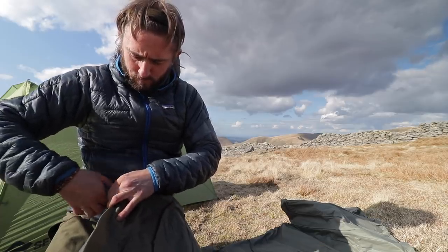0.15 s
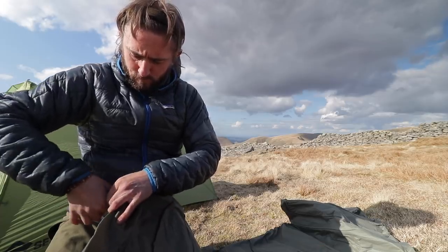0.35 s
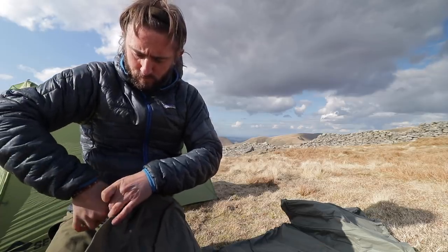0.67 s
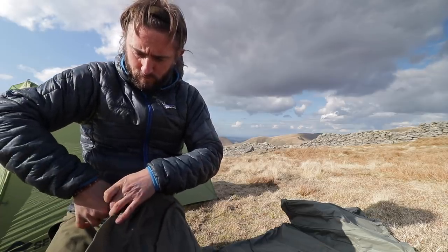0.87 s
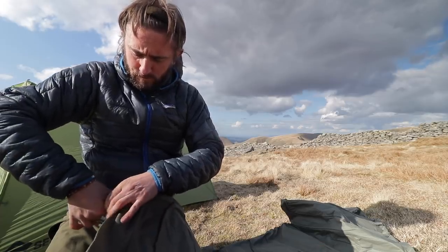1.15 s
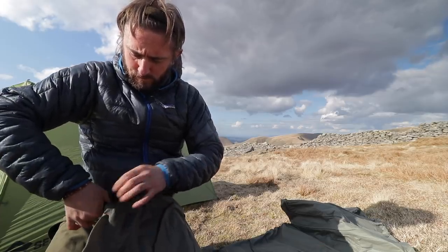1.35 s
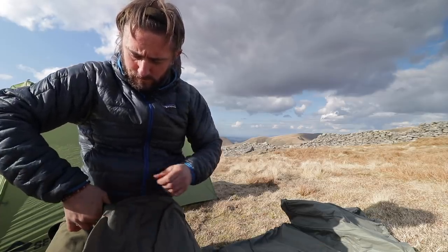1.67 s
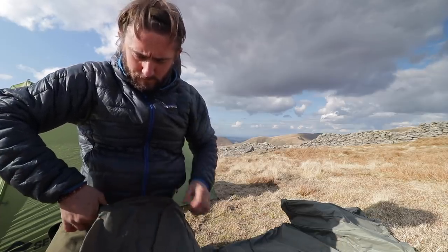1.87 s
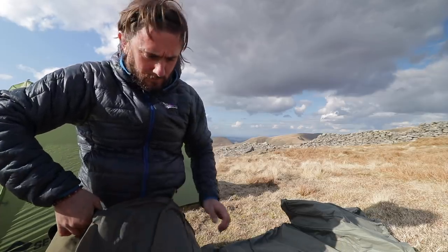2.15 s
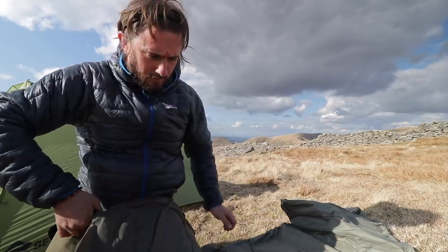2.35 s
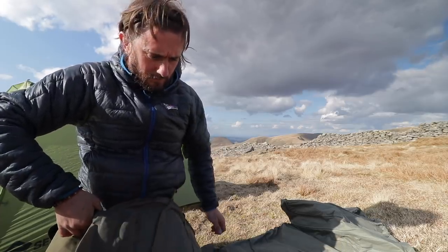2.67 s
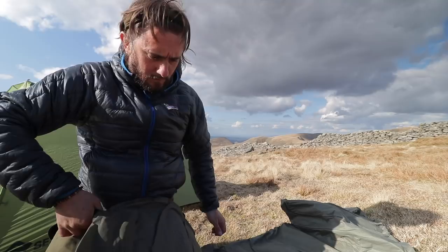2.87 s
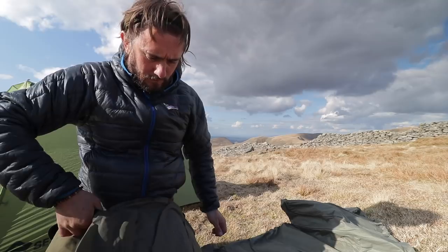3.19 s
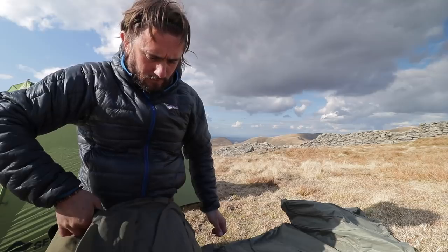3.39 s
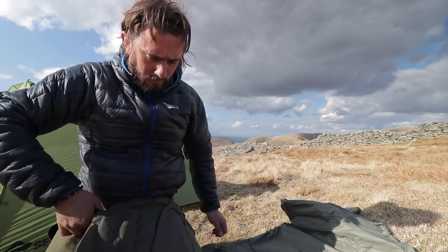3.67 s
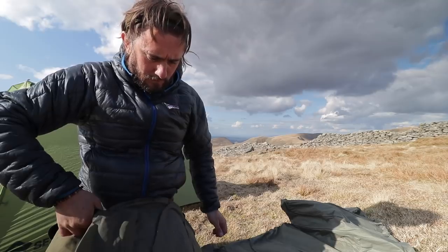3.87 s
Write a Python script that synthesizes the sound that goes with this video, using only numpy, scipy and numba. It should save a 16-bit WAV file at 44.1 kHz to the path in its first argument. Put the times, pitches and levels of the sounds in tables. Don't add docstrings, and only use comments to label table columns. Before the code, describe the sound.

Close, continuous rushing air and a fine electric whine from a palm-sized blower, lightly shaded by fingers, over very faint open-air wind.

```python
import sys
import numpy as np
from scipy import signal
from scipy.fft import rfft, irfft
from scipy.io import wavfile
from scipy.ndimage import uniform_filter1d
from numba import njit

SR = 44100
rng = np.random.default_rng(int(sys.argv[2]) if len(sys.argv) > 2 else 0)


def pcm_store(signal):
    levels = np.round(np.clip(np.atleast_2d(signal), -1, 1) * 32767)
    wavfile.write(sys.argv[1], SR, levels.astype(np.int16).T)


def volts_from_decibels(level):
    exponent = np.asarray(level, float) / 20
    return 10 ** exponent


N = 177365
TIME = np.arange(N) / SR
BINS_HZ = np.arange(N // 2 + 1) * SR / N
HAND_LIFTS_S = 1.34


def level(x, db):
    return x * volts_from_decibels(db) / np.sqrt(np.mean(x ** 2))


def columns(table):
    s, *rest = np.transpose(table)
    return [np.interp(TIME, s, column) for column in rest]


def gesture(s, half):
    return np.exp(-np.abs((TIME - s) / half) ** 3)


def gestures_db(table):
    return sum(db * gesture(s, half) for s, half, db in table)


def lifted(s):
    return (1 + np.tanh((TIME - s) / 0.028)) / 2


def walk(rate):
    hold = int(SR / rate)
    steps = np.repeat(rng.standard_normal(N // hold + 1), hold)
    return 2.16 * uniform_filter1d(uniform_filter1d(steps, hold), hold)[:N]


@njit
def svf(x, hz, width):
    y, band, low = np.empty(len(x)), 0., 0.
    for i in range(len(x)):
        g, k = np.tan(np.pi * hz[i] / SR), width / hz[i]
        v = (band + g * (x[i] - low)) / (1 + g * (g + k))
        band, low, y[i] = 2 * v - band, low + 2 * g * v, k * v
    return y


def rush(modes, centre_hz=0., flank_db=0., flicker_db=0.4):
    out, power = 0, 0
    for i, (hz, width, db) in enumerate(modes):
        track = hz + centre_hz + np.zeros(N)
        band = svf(rng.standard_normal(N), track, 1.63 * width)
        band = svf(band, track, 1.63 * width)
        gain = volts_from_decibels(db + flank_db * (i > 0))
        out = out + gain * volts_from_decibels(flicker_db * walk(6.2)) * band
        power = power + gain ** 2 * np.mean(band ** 2)
    return out / np.sqrt(power)


# (time [s], shaft rate [Hz])
SHAFT_SPEED = [(0, 621.5), (.1, 619.6), (.62, 616.7), (.8, 619.2), (.95, 617.8), (1, 615.8), (1.25, 619.2),
               (1.46, 619.8), (1.54, 618), (1.7, 623.5), (1.85, 625.4), (2, 623.5), (2.1, 625),
               (2.85, 627.5), (3.05, 626), (3.38, 628.5), (3.8, 623), (4.02, 623.7)]
# (time [s], level [dB])
BLADE_TONE = [(0, -39), (.07, -36.5), (.17, -48), (.33, -51), (.4, -61), (.49, -49.5), (.64, -49.5),
              (.68, -48), (.85, -42.5), (1.02, -51), (1.17, -45), (1.6, -44.5), (1.9, -42.5), (2.13, -44),
              (2.29, -50), (3.6, -49.5), (3.8, -55), (4.02, -53.5)]
# (multiple of shaft rate, level under the hand [dB], level once it has lifted [dB])
STRONG_TONES = [(3, -56.5, -48.5), (5, -54.5, -54.5), (16, -62.5, -58.5), (17, -55, -61.5),
                (18, -49.5, -52.5), (19, -63, -57.5), (21, -65, -65), (22, -69, -69), (23, -59, -70),
                (24, -62, -60.5), (25, -75, -77)]
# (multiple of shaft rate, steady level [dB], level against tone 17, whose path they share [dB])
WEAK_TONES = [(1, -73, -53), (2, -62, -51), (4, -55.5, -40), (6, -60, -54), (8, -58.5, -47), (10, -70, -22),
              (12, -72, -13), (15, -69, -18), (20, -90, -15)]
# (time [s], multiple of shaft rate, half length [s], level [dB])
GLINTS = [(.07, 21, .07, 10), (.07, 24, .07, 8), (0.087, 18, 0.066, 4.5), (0.266, 5, 0.25, 5),
          (.25, 19, .06, 4), (0.303, 18, .05, 8.5), (.3, 5, 0.053, 3), (.33, 21, .05, 5.5),
          (.37, 16, .05, 12), (.52, 17, .12, 4.5), (.64, 16, .1, 13), (.7, 19, 0.069, 7), (.7, 25, .08, 17),
          (.72, 23, .13, 7), (.75, 22, .08, 9), (1.05, 16, .1, 8), (1.05, 22, .06, 10), (1.08, 25, .1, 15),
          (1.1, 23, .12, 3), (1.2, 21, .1, 6), (1.37, 24, .09, 8), (1.48, 25, .03, 11), (1.52, 22, .1, 3),
          (1.55, 19, .13, 5), (1.84, 18, 0.27, 7), (1.9, 24, .25, 3), (2.13, 16, .12, 4),
          (3.152, 5, 0.32, 3), (3.9, 19, .2, 3.5), (3.9, 24, 0.22, 4)]
# (time [s], multiple of shaft rate, half length [s], level [dB])
NULLS = [(.02, 17, .06, -7), (.1, 3, .04, -10), (.2, 18, .03, -4), (.3, 17, .04, -5), (.35, 19, .03, -9),
         (.35, 23, .13, -10), (.45, 3, .12, -10), (.47, 19, .04, -9), (.48, 24, .05, -7), (.7, 17, .04, -9),
         (.8, 18, .08, -5), (.84, 16, .06, -9), (.86, 19, .05, -9), (.92, 17, .03, -7), (.93, 23, .05, -9),
         (1.2, 24, .04, -6), (1.214, 18, 0.067, -12), (1.335, 18, .015, -13), (1.35, 5, .2, -12),
         (1.49, 18, .015, -12), (1.6, 18, 0.049, -11), (1.65, 16, .3, -7), (1.83, 17, .08, -7),
         (1.9, 5, 0.27, -5), (2, 19, .08, -14), (2.3, 18, 0.27, -12), (3.05, 24, .15, -6),
         (3.45, 17, .15, -7), (3.85, 18, .22, -12), (3.9, 5, 0.074, -11)]


def impeller():
    shaft_hz, = columns(SHAFT_SPEED)
    blade_db, = columns(BLADE_TONE)
    turn = 2 * np.pi * np.cumsum(shaft_hz + 0.18 * walk(40)) / SR
    free = lifted(HAND_LIFTS_S)
    tone_db = {k: held_db + (free_db - held_db) * free for k, held_db, free_db in STRONG_TONES}
    for s, k, half, db in GLINTS + NULLS:
        tone_db[k] = tone_db[k] + db * gesture(s, half)
    gains = {k: volts_from_decibels(db) for k, db in tone_db.items()}
    gains[9] = volts_from_decibels(blade_db)
    for k, steady_db, shared_db in WEAK_TONES:
        gains[k] = volts_from_decibels(steady_db) + volts_from_decibels(shared_db) * gains[17]
    out = np.zeros(N)
    for k, gain in gains.items():
        waver = volts_from_decibels(0.6 * walk(30))
        out += np.sqrt(2) * gain * waver * np.sin(k * turn + 2 * np.pi * rng.random())
    return out


# (time [s], nearness of the pump [dB], opening past the fingers [dB],
# inlet pitch [Hz], grille pitch [Hz], spread of the jet [dB])
HAND = [(0, 3, -1, 4200, 7030, -23), (.17, 1.6, -2.5, 4500, 6990, -15), (.3, 0.5, -6.5, 4250, 7600, -1),
        (.46, -0.6, -5, 3933, 7450, -12), (.6, -0.7, -4, 4080, 7400, -17), (.68, -1.8, 1, 3970, 7340, -8),
        (.76, 0.2, -4.5, 3980, 7650, -9), (.83, 0.2, -4.5, 3970, 7000, -3), (.94, 0.6, -2.5, 3970, 7350, 0),
        (.98, -0.5, -1, 3960, 7260, -6), (1.04, -0.2, -3, 4140, 7200, -5),
        (1.29, 0.9, -3.5, 3990, 7270, -11), (1.33, -0.3, -0.5, 4070, 7160, 6),
        (1.53, .6, -1, 4110, 7150, -1), (1.58, 1, 2, 4120, 7120, -5), (1.93, 1.2, 1, 4170, 7200, -4),
        (2.07, 0.3, -1, 4288, 7150, 0.5), (4.02, .5, -0.1, 4320, 7224, -4)]


def hand():
    return columns(HAND)


# (pitch [Hz], width [Hz], level [dB])
HOUSING = [(2406, 503, 2), (430, 187, -20.5), (753, 284, -2), (1350, 318, 1), (1586, 325, -3),
           (1928, 176, 1), (2767, 180, 0), (3290, 510, -10)]


def housing(near_db, open_db, spread_db):
    gain = volts_from_decibels(-40.5 + 0.83 * near_db + 0.02 * open_db)
    return gain * rush(HOUSING, flank_db=1.5 + 0.28 * spread_db)


# (pitch [Hz], width [Hz], level [dB])
GAP = [(5300, 1270, 0), (5950, 460, 0)]


def gap(near_db, open_db):
    return volts_from_decibels(-51.5 + 2.7 * near_db + 0.05 * open_db) * rush(GAP)


# (offset from the centre [Hz], width [Hz], level [dB])
INLET = [(-20, 350, 4), (-380, 350, 3), (352, 305, 3.5), (800, 460, -12)]
# (time [s], half length [s], level [dB])
SLIDES = [
    (.3, .08, -0.5),
    (0.737, .05, -3.5),
    (0.943, 0.032, -2.5),
    (0.983, 0.01, 4),
    (1.2, 0.07, 2.5),
    (1.413, 0.13, -3),
    (1.68, .1, -1.5),
    (3.85, .2, -0.5),
]


def inlet(near_db, open_db, inlet_hz):
    cupped_db, pinched_db, free_db = 11, -7.5, -2
    flank_db = cupped_db + (pinched_db - cupped_db) * lifted(0.42) + (free_db - pinched_db) * lifted(1.5)
    gain = volts_from_decibels(-43 + 0.34 * near_db + 0.75 * open_db + gestures_db(SLIDES))
    return gain * rush(INLET, inlet_hz, flank_db)


# (offset from the centre [Hz], width [Hz], level [dB])
GRILLE = [(-18, 600, 1.4), (-650, 360, -2), (719, 390, 0)]


def grille(near_db, open_db, grille_hz, spread_db):
    flicker_db = 0.4 + 0.45 * gesture(1.4, 0.35)
    gain = volts_from_decibels(-42 + 0.02 * near_db + 1.39 * open_db)
    return gain * rush(GRILLE, grille_hz, spread_db, flicker_db)


# (pitch [Hz], width [Hz], level [dB])
TIP_LOW = [(8720, 1040, 5.5), (9790, 720, 10.5), (10650, 210, 0)]
# (pitch [Hz], width [Hz], level [dB])
TIP_HIGH = [(11030, 1200, 0), (12040, 800, -2.5), (12780, 500, 4.5), (13450, 650, 1), (13900, 420, -1),
            (14500, 600, 2), (14950, 500, -3), (15400, 400, -2)]


def blade_tips(near_db, open_db):
    sleeve_db = 2 * gesture(1.5, 0.39)
    low = volts_from_decibels(-52.5 + 1.2 * near_db + 0.73 * open_db + sleeve_db) * rush(TIP_LOW)
    high = volts_from_decibels(-52.5 + 0.3 * near_db + 0.05 * open_db) * rush(TIP_HIGH)
    return low + high


def air():
    near_db, open_db, inlet_hz, grille_hz, spread_db = hand()
    body = housing(near_db, open_db, spread_db) + gap(near_db, open_db)
    openings = inlet(near_db, open_db, inlet_hz) + grille(near_db, open_db, grille_hz, spread_db)
    return body + openings + blade_tips(near_db, open_db)


# (pitch [Hz], width [Hz], share removed [0-1])
ECHO_DIPS = [(1026, 148, 0.61), (2207, 94, 0.38), (3640, 170, 0.46)]
# (pitch [Hz], width [Hz], share removed [0-1], start [s], end [s])
HAND_DIPS = [
    (12700, 300, .65, -1, .97),
    (6200, 500, .4, .3, 0.56),
    (15750, 500, .6, .2, 1.57),
    (14450, 400, .35, .9, 2),
    (7140, 220, 0.55, 1.34, 2),
]


def echoed(x):
    for hz, width, share in ECHO_DIPS:
        x = x - share * svf(x, hz + np.zeros(N), width)
    for hz, width, share, start, end in HAND_DIPS:
        close = lifted(start) - lifted(end)
        x = x - share * close * svf(x, hz + np.zeros(N), width)
    return x


# (time [s], half length [s], level over the breeze [dB])
GUSTS = [(0, .05, 8), (.3, .13, 4), (.66, .04, 4), (.76, 0.055, 4), (.97, .05, 1), (1.15, .04, 7),
         (1.3, .1, 3), (1.86, .19, 11.5), (2.15, 0.11, 7), (2.366, 0.14, 15), (2.658, 0.11, 12),
         (2.93, 0.069, 12), (3.2, .2, 6), (3.5, .15, 4), (3.768, .05, 10), (4.02, .05, 3)]


def wind():
    low_band = signal.butter(2, [16, 55], "bandpass", fs=SR, output="sos")
    puff = signal.sosfilt(low_band, rng.standard_normal(N))
    breeze_db = -75
    return volts_from_decibels(breeze_db + gestures_db(GUSTS)) * level(puff * volts_from_decibels(1.1 * walk(14)), 0)


# (pitch [Hz], level per Hz [dB])
MOOR = [(41, -58), (70, -14.5), (140, -13), (323, -3.5), (381, -2.5), (438, 6), (500, -4.5), (650, -43),
        (1100, -120)]


def moor():
    hz, db = np.transpose(MOOR)
    colour_db = np.interp(np.log(np.maximum(BINS_HZ, 1)), np.log(hz), db, -80, -80)
    hush = irfft(rfft(rng.standard_normal(N)) * volts_from_decibels(colour_db), N)
    return level(hush, -67)


# (time [s], low edge [Hz], high edge [Hz], level [dB])
SPLITS = [
    (.05, 4230, 5300, -46),
    (.05, 6800, 8300, -49),
    (.748, 5630, 6900, -53),
    (1.746, 5670, 7600, -44),
    (2.093, 5650, 6940, -48),
    (2.14, 6700, 8800, -47),
    (3.046, 5670, 7750, -46),
    (3.742, 4170, 5300, -46),
    (3.742, 7600, 8900, -51),
    (3.766, 6300, 7700, -45),
]


def splits():
    out, hiss = np.zeros(N), rfft(rng.standard_normal(N))
    for s, low_hz, high_hz, db in SPLITS:
        puff = np.cos(np.pi / 2 * np.clip((TIME - s) * SR / 640, -1, 1) ** 2) ** 2
        band = irfft(hiss * (BINS_HZ > low_hz) * (BINS_HZ < high_hz), N)
        out += puff * level(band, db)
    return out * np.array([[1], [-1]])


# (start [s], end [s], low edge [Hz], high edge [Hz])
HOLES = [
    (.5, .57, 12420, 12760),
    (.27, .33, 15050, 15350),
    (.49, .54, 15050, 15330),
    (.62, .8, 15050, 15250),
    (.7, .79, 14500, 14700),
    (1.28, 1.56, 15050, 15300),
    (1.39, 1.45, 15300, 15740),
    (1.41, 1.47, 12050, 12250),
]


def thinned(x):
    lines = rfft(x)
    out = irfft(lines * (BINS_HZ < 15740), N)
    for start, end, low_hz, high_hz in HOLES:
        gate = uniform_filter1d(1. * (TIME > start) * (TIME < end), size=500)
        out = out - gate * irfft(lines * (BINS_HZ > low_hz) * (BINS_HZ < high_hz), N)
    return out


# (time [s], peak level [dB], pitch [Hz])
BUMPS = [
    (.68, -42, 490),
    (1.099, -52, 350),
    (1.182, -45, 400),
]


def bumps():
    out = np.zeros(N)
    for s, db, hz in BUMPS:
        age = np.maximum(TIME - s, 0)
        out += volts_from_decibels(db + 3) * np.sin(2 * np.pi * hz * age) * np.exp(-age * hz / 1.5)
    return signal.sosfilt(signal.butter(2, 170, "highpass", fs=SR, output="sos"), out)


def scene():
    return np.tile(impeller() + echoed(air()) + wind() + moor() + bumps(), (2, 1))


def roll_off(x):
    return signal.sosfilt(signal.butter(12, 15970, fs=SR, output="sos"), x)


def record(dry):
    mix = thinned(dry) + splits()
    return roll_off(mix)


dry = scene()
out = record(dry)
pcm_store(out)
```